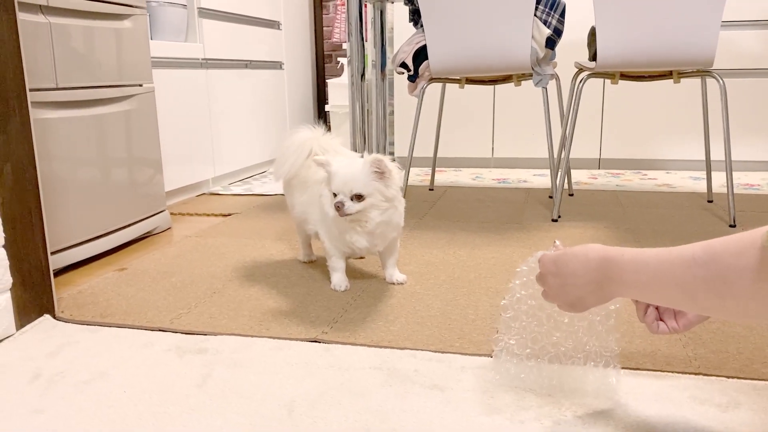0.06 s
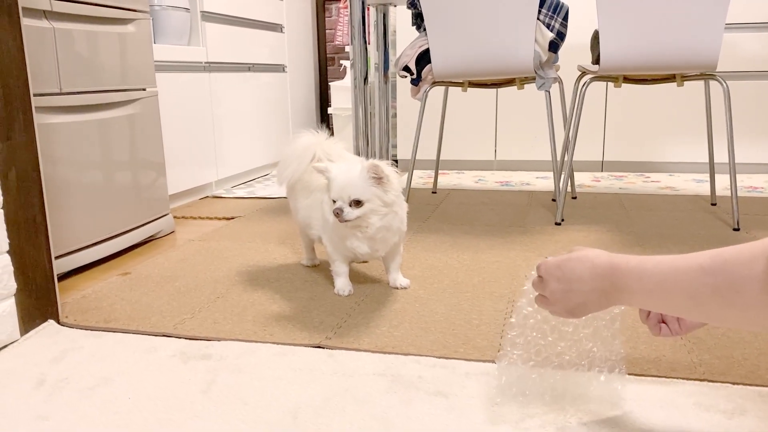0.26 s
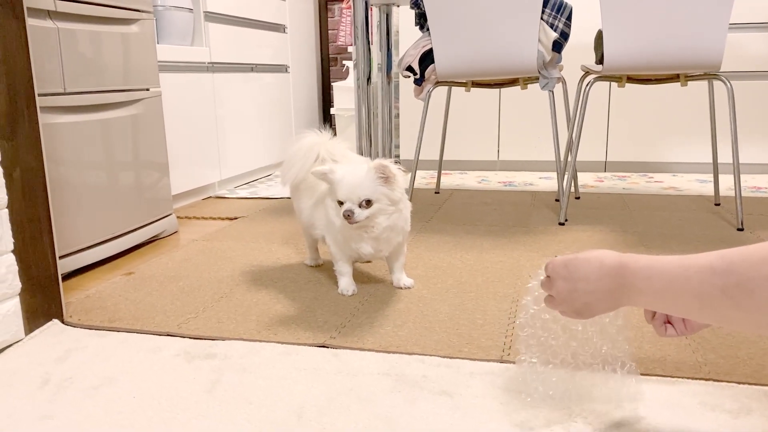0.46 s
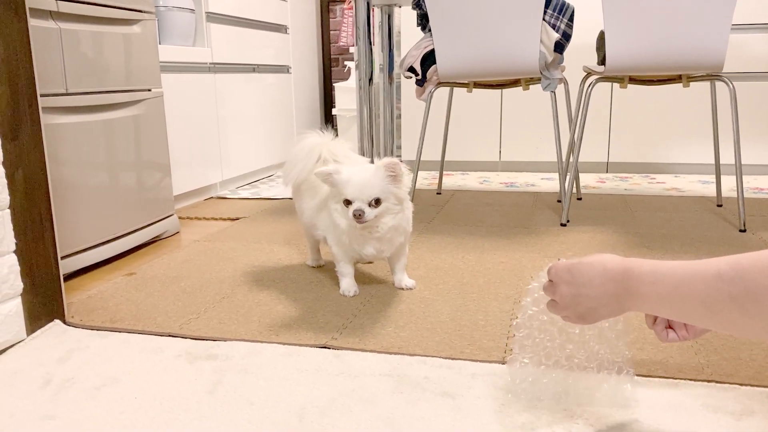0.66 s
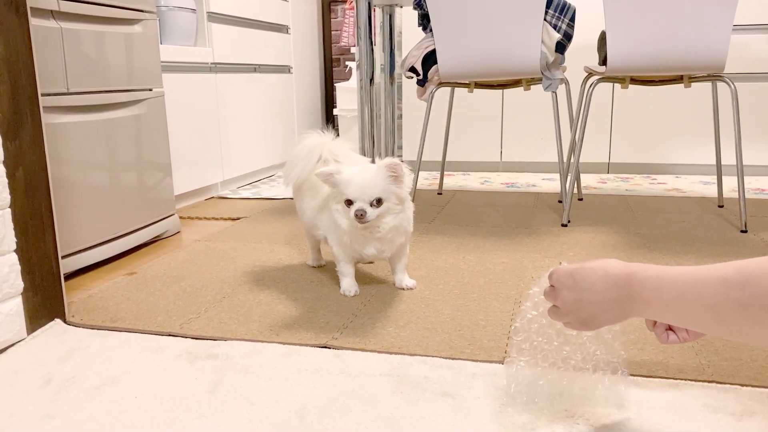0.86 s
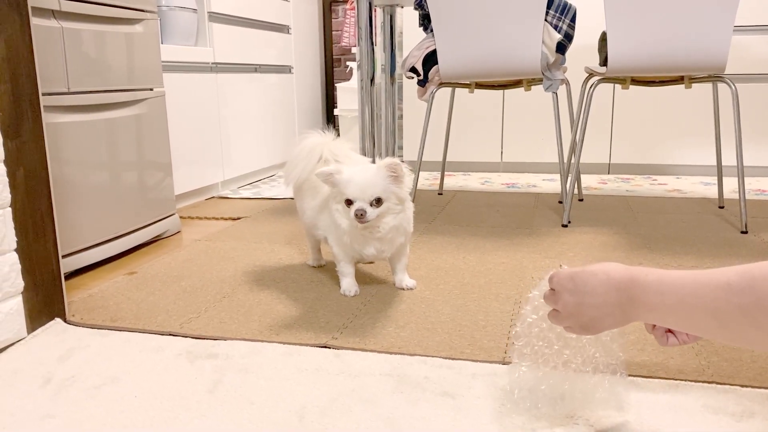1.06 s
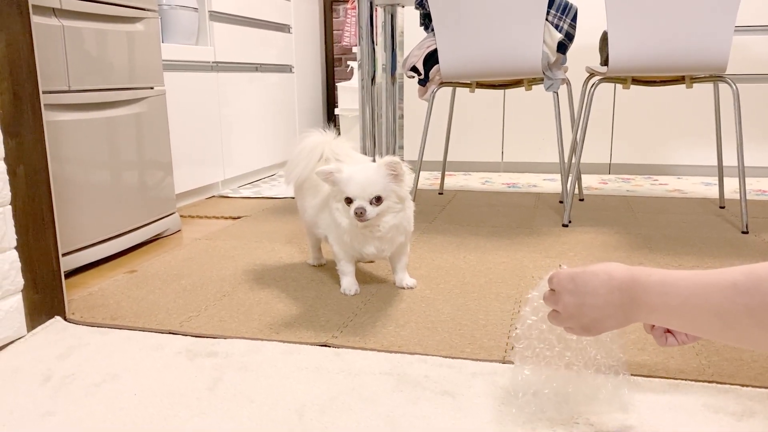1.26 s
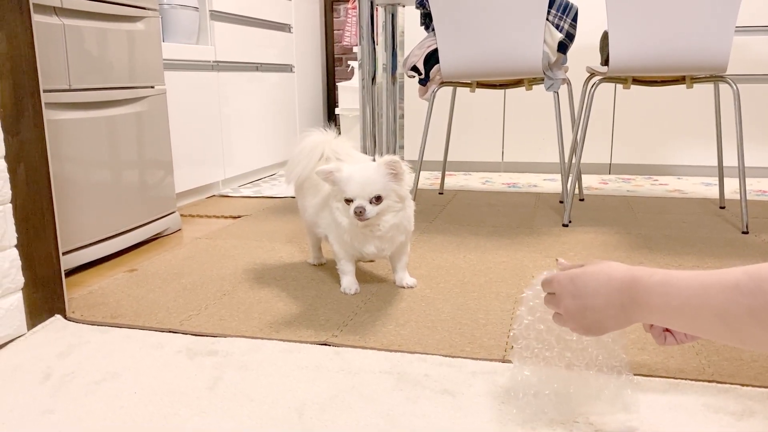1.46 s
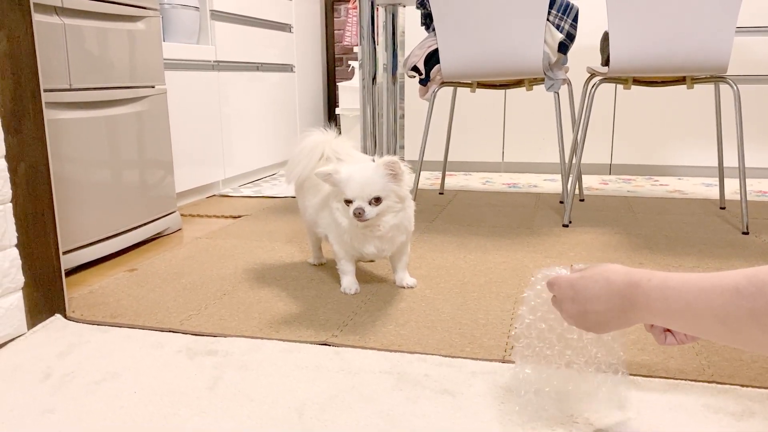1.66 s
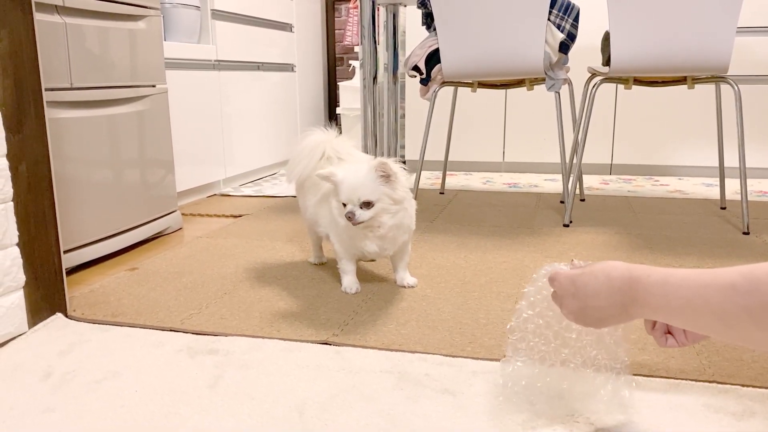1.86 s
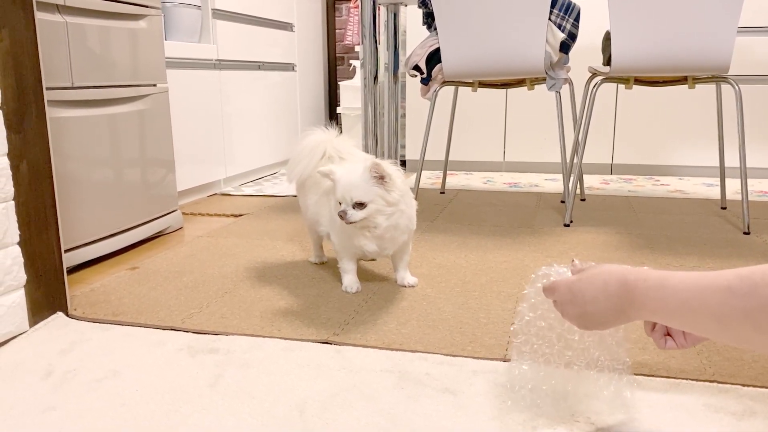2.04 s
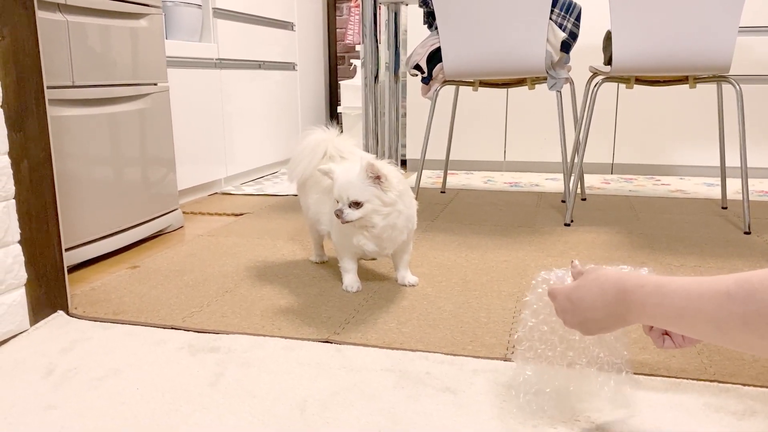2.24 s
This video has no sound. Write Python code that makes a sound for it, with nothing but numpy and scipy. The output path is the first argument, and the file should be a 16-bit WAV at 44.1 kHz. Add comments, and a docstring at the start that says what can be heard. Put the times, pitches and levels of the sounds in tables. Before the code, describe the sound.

One bubble of bubble wrap bursts with a sharp crack and a brief echo in a small, quiet kitchen. Fingers then crinkle the sheet faintly, close to the microphone, over a very low room rumble.

```python
"""Faint crinkling over a low room rumble: a hand squeezes bubble wrap just above the floor of a small,
quiet kitchen. One bubble bursts with a crack and a short hollow ring, thrown back by floor and
cupboards, and the room dies away. The film crinkles again, close by, as the fingers seek the next bubble."""
import sys
import numpy as np
from scipy import signal
from scipy.io import wavfile
from scipy.ndimage import uniform_filter1d

SR = 44100
rng = np.random.default_rng(int(sys.argv[2]) if len(sys.argv) > 2 else 0)


def to_wav(s):
    """Save 16-bit WAV."""
    ch = np.atleast_2d(s).T  # columns
    pcm = np.round(np.clip(ch, -1, 1) * 32767)  # PCM
    wavfile.write(sys.argv[1], SR, pcm.astype(np.int16))


N = 105840
TIME = np.arange(N) / SR

# Colour of the plastic film's rustle. Each row: frequency in Hz, relative level in dB per Hz.
FILM_COLOUR = [(240, -34), (400, -4), (2320, -3.5), (2710, -10.5), (5350, -6), (8370, -23), (9920, -14),
               (12100, -21), (14400, -12.5), (16000, -29.5)]


def amp(db):
    """Decibels to gain."""
    return 10 ** (np.asarray(db) / 20)


def unit_rms(x):
    """Scale to an rms of 1."""
    return x / np.sqrt(np.mean(x ** 2) + 1e-20)


def at_hz(points, hz):
    """Read a table on a log-frequency axis."""
    freqs, values = np.transpose(points)
    return np.interp(np.log(hz), np.log(freqs), values)


def pan(db):
    """Channel gains that put the left db above the right."""
    return amp([[db / 2], [-db / 2]])


def cut(x, hz, kind, order=2):
    """Butterworth filter."""
    sos = signal.butter(order, np.clip(hz, 10, .45 * SR), kind, fs=SR, output="sos")
    return signal.sosfilt(sos, x + 1e-18)


def delay(x, s):
    """Start a sound s seconds later, at the full length."""
    out = np.zeros(x.shape[:-1] + (N,))
    start = int(np.clip(round(s * SR), 0, N - 1))
    out[..., start:start + x.shape[-1]] = x[..., :N - start]
    return out


def ring(hz, t60, t=TIME):
    """A struck mode of height 1 that falls 60 dB in t60 seconds."""
    return np.sin(2 * np.pi * hz * t) * amp(-60 * np.minimum(t / t60, 5))


def diffuse(spectrum, envelope=lambda hz: 1):
    """Noise from all round the microphone, in third octaves; rms 1 before each band's envelope."""
    # Likeness of left and right in the room. Each row: frequency in Hz, correlation from 0 to 1.
    likeness = [(60, 1), (200, 0.8), (400, .55), (800, .22), (1400, .12), (2800, 0.1), (7000, .08),
                (15000, 0)]
    out, power = 0, 0
    edges = 22 * 2 ** (np.arange(30) / 3)
    white = rng.standard_normal((2, 2, N))
    for k, (low, high) in enumerate(zip(edges, edges[1:])):
        hz = np.sqrt(low * high)
        mid, side = cut(white[k % 2], [low, high], "band")
        alike, gain = at_hz(likeness, hz), amp(at_hz(spectrum, hz))
        band = gain * (np.sqrt(1 + alike) * mid + np.sqrt(1 - alike) * side * [[1], [-1]])
        out += band * envelope(hz)
        power += np.mean(band ** 2)
    return out / np.sqrt(power)


def room_rumble():
    """The faint, steady low noise of the still kitchen."""
    # Colour of the room tone. Each row: frequency in Hz, relative level in dB per Hz.
    colour = [(15, -43), (25, -10), (59, -5), (123, -1), (145, -16.5), (229, -4), (317, -14.5), (463, -16),
              (516, -21), (714, -21), (775, -23), (1070, -26.5), (2760, -40.5), (16000, -54.5)]
    return amp(-64.5) * diffuse(colour)


def kitchen(spectrum, build_s=.0022, beyond_t60_s=.45):
    """The room's answer to a click: quick build-up, decay by band, a faint ring of the rooms beyond."""
    # The kitchen's decay. Each row: frequency in Hz, seconds to fall 60 dB.
    decay = [(80, 0.45), (250, 0.27), (600, 0.18), (1500, 0.21), (4000, 0.17), (9000, .2), (15000, 0.15)]
    beyond = amp(-25 - 60 * TIME / beyond_t60_s)
    tail = diffuse(spectrum, lambda hz: amp(-60 * TIME / at_hz(decay, hz)) + beyond)
    return delay(tail * (1 - np.exp(-TIME / build_s)), s=.002)


def hand_nudges(band_ratio=1.454):
    """Dull knocks and rubs, soft swells of low noise, as the hand shifts its grip."""
    # Each row: time of the peak in seconds, level in dB, band centre in Hz, half length in seconds.
    swells = [(0.117, -59.5, 99, 0.011), (0.597, -62.5, 135, 0.049), (0.8, -64, 110, 0.045),
              (1.519, -64, 128, 0.018), (1.7, -65, 186, 0.084), (1.932, -58.5, 143, 0.042),
              (2.005, -62.5, 228, 0.015), (2.135, -62, 310, 0.07), (2.171, -65.5, 130, 0.12),
              (2.403, -59.5, 190, 0.053)]
    out = 0
    for peak_s, db, hz, half_s in swells:
        swell = amp(db - 7.4 * np.minimum(((TIME - peak_s) / half_s) ** 2, 20))
        rub = cut(rng.standard_normal(N), [hz / band_ratio, hz * band_ratio], "band")
        out += swell * unit_rms(rub)
    return out


def crinkle(buckles_per_s=1200, clump_s=.027, clump_db=3.5, spread_db=3.5, share=.31, ring_cycles=11):
    """Tiny buckles of the film swell in clumps; each rings a random share of its resonances."""
    clumps = unit_rms(uniform_filter1d(rng.standard_normal(N), int(clump_s * SR) + 1))
    buckles = rng.random(N) < buckles_per_s / SR
    sizes = buckles * amp(clump_db * clumps + spread_db * np.minimum(rng.exponential(1, N), 3))
    out = 0
    for hz in np.geomspace(450, 15000, 24):
        strikes = sizes * (rng.random(N) < share) * rng.choice([-1, 1], N)
        grains = signal.fftconvolve(strikes, ring(hz, ring_cycles / hz, TIME[:SR // 20]))[:N]
        # higher resonances stand for wider bands, hence the square root
        out += unit_rms(grains) * amp(at_hz(FILM_COLOUR, hz)) * np.sqrt(hz)
    return unit_rms(out)


def creases(tick_fade_s=.0012, tick_low_hz=1200, ring_cycles=23):
    """Single creases snap over: each gives a bright tick and rings a small patch of film."""
    # Each row: start in seconds, relative level in dB, pitch in Hz.
    snaps = [(0.1002, -50, 2000), (0.122, -46, 2240), (0.1384, -48, 3760), (.1865, -43, 3500),
             (0.216, -48, 1929), (0.472, -50, 2044), (.561, -49.5, 1980), (0.59, -51.5, 2290),
             (.649, -52, 1870), (.678, -52, 4925), (0.741, -56, 4630), (0.88, -53.5, 2297),
             (1.289, -63.5, 2885), (1.444, -56.5, 2076), (1.481, -58.5, 1640), (1.5054, -47, 1693),
             (1.513, -48.5, 3300), (1.544, -58, 1990), (1.625, -46, 1830), (1.668, -64, 1620),
             (1.693, -39.5, 2340), (1.6953, -40.5, 1730), (1.7305, -46, 4740), (1.773, -43, 1990),
             (1.781, -40, 2650), (1.802, -40, 4500), (1.813, -41, 2190), (1.8887, -45.5, 1540),
             (1.9458, -40, 2300), (1.9491, -45.5, 3000), (1.9904, -43.5, 2040), (2.0516, -49.5, 5500),
             (2.075, -55, 3560), (2.164, -54, 3000), (2.175, -50, 6170), (2.236, -50.5, 2000)]
    out, t = 0, TIME[:SR // 20]
    for start, db, hz in snaps:
        noise = rng.standard_normal(len(t)) * np.exp(-t / tick_fade_s)
        tick = cut(noise, [tick_low_hz, tick_low_hz + 1.4 * hz], "band", order=1)
        patch = ring(hz, ring_cycles / hz, t)
        out += amp(db) * delay(amp(-4) * tick + amp(-4.5) * patch, start)
    return out


def sheet():
    """The fingers work the wrap: creases, crinkle and the hiss of sliding film, with some room."""
    # Strength of the rustle. Each row: time in seconds, relative level in dB.
    handling = [(0, -77.5), (.08, -86), (.11, -72.5), (.14, -60), (.175, -60), (.225, -50.5), (.31, -46),
                (.41, -59.5), (.47, -74), (.55, -81.5), (.6, -74), (.63, -74), (.69, -68.5), (.79, -83),
                (.9, -86), (1.4, -89.5), (1.498, -72.5), (1.508, -58.5), (1.63, -68), (1.70, -55),
                (1.755, -61.5), (1.81, -58.5), (1.9, -73.5), (1.942, -73.5), (1.949, -56.5), (2.03, -76),
                (2.08, -68), (2.17, -67.5), (2.27, -76.5), (2.4, -60)]
    effort = amp(np.interp(TIME, *np.transpose(handling)))
    snaps = creases()
    rustle = amp(-3.5) * effort * crinkle()
    room = kitchen([(100, 0), (2000, .29), (15000, -1.1)])
    room /= np.sqrt(np.sum(room ** 2) / 2)
    send = amp(-2.5) * snaps + rustle   # creases snap close by and are drier than the rustle
    reverb = signal.fftconvolve(send[None], room, axes=1)[:, :N]
    slide = amp(-3.5) * effort * cut(diffuse(FILM_COLOUR), 300, "high")
    return (snaps + rustle) * pan(db=1) + amp(-4.5) * reverb + slide


def thump(start_hz=543.7, end_hz=73, sag_s=.006, rise_s=.0039):
    """The released air and sheet give a short low push, sinking in pitch."""
    hz = end_hz + (start_hz - end_hz) * np.exp(-TIME / sag_s)
    age = np.minimum(TIME / rise_s, 20)
    return amp(-26) * age * np.exp(1 - age) * np.sin(2 * np.pi * np.cumsum(hz) / SR)


def recoil():
    """The sheet springs back with a thump and rings on."""
    # The sheet's modes. Each row: frequency in Hz, level in dB, seconds to fall 60 dB.
    modes = [(100.54, -40.5, 0.24), (232.3, -29.5, .14), (365, -27.5, 0.062), (528, -31.5, .1),
             (869, -33, 0.16)]
    return thump() + sum(amp(db) * ring(hz, t60) for hz, db, t60 in modes)


def cavity_ring():
    """The burst bubble rings hollow, its modes alternating in sign."""
    # Each row: frequency in Hz, relative level in dB, seconds to fall 60 dB.
    modes = [(1390, -6.5, 0.005), (2830, -17, 0.0078), (4389, -14.5, 0.0033)]
    hollow = -sum(amp(db) * ring(hz, t60) * (-1) ** k for k, (hz, db, t60) in enumerate(modes))
    return cut(hollow, 640, "high", order=1)


def film_rip(start, fade_s=.0013):
    """The film rips open in a flash of bright noise."""
    noise = cut(rng.standard_normal((2, N)), 3000, "high")
    return amp(-17.5) * delay(noise * np.exp(-np.minimum(TIME / fade_s, 20)), start)


def pressure_spike():
    """The crack of the burst: one pulse of pressure, shorn of top and bass."""
    pulse = cut(2 * (TIME == 0), 4500, "low", order=1)
    return amp(-5.5) * cut(pulse, 640, "high", order=1)


def bubble_pop(start):
    """One bubble bursts: the direct sound arrives first, then floor and cupboards, then the room."""
    # First reflections. Each row: delay in seconds, level in dB, left over right in dB,
    # extra level of the rip in dB.
    reflections = [(.0034, -6.5, 8.5, 5.5), (.0041, -16, -1.5, 3), (.0051, -16.5, -3.5, 9),
                   (.0066, -15.5, -2.5, 7.5), (.0100, -12.5, 7.5, 0), (.0111, -13.5, 7, -1.5),
                   (0.0133, -9, 3.5, 3.5), (.0177, -16, -6.5, 0), (.0248, -19, -1.5, 4)]
    # Colour of the burst in the room. Each row: frequency in Hz, relative level in dB per Hz.
    tail_colour = [(35, -40), (60, -12.5), (607, -4), (968, -2.5), (1550, -3), (1780, -5), (2090, -4.5),
                   (7230, -9.5), (8510, -14), (10000, -11.5), (12100, -21), (13600, -14), (16000, -21)]
    rip_start = start - .00036   # the film tears just ahead of the crack
    spike = delay(pressure_spike(), start)
    hollow = delay(cavity_ring(), start + .0001)
    rebound = delay(recoil(), start + .003)
    echoes = 0
    for lag, db, side_db, rip_db in reflections:
        burst = spike + amp(rip_db) * film_rip(rip_start) + .27 * hollow
        echoes += amp(db) * pan(side_db) * delay(burst, lag)
    direct = film_rip(rip_start) + spike * pan(db=1.5) + (hollow + rebound) * pan(db=-4)
    tail = cut(kitchen(tail_colour), 190, "high", order=1)   # the burst feeds little bass to the room
    return direct + echoes + amp(-20) * delay(tail, start)


def scene():
    """Burst, sheet and hand over the still room."""
    return bubble_pop(start=.2403) + sheet() + (hand_nudges() + room_rumble()) * pan(db=-1.5)


def record(dry, cutoff_hz=15700):
    """The microphone sheds the deep bass and ripples the treble; the top is cut steeply."""
    # The microphone's peaks and dips. Each row: centre in Hz, gain in dB, width in Hz.
    ripples = [(8350, -7.5, 1300), (9750, 4, 1800), (12100, -22, 1200), (14050, 4, 530)]
    dry = cut(dry, hz=39.08, kind="high", order=3)
    for hz, db, width in ripples:
        band = signal.lfilter(*signal.iirpeak(hz, hz / width, fs=SR), dry)
        dry = dry + (amp(db) - 1) * band
    return signal.sosfilt(signal.ellip(10, .2, 80, cutoff_hz, fs=SR, output="sos"), dry)


dry = scene()
out = record(dry)
to_wav(out)
```